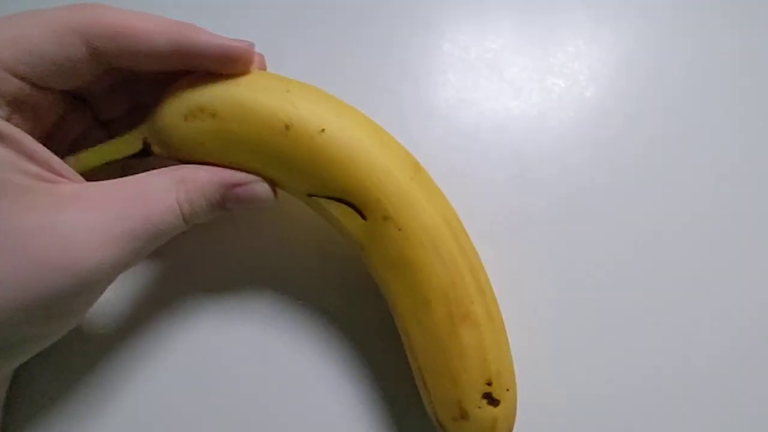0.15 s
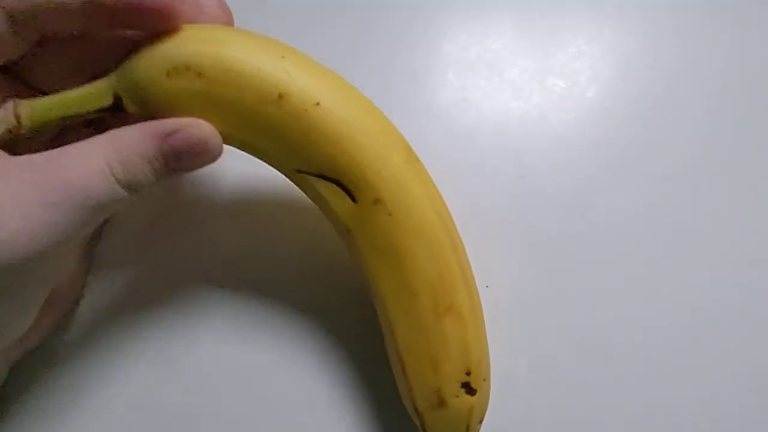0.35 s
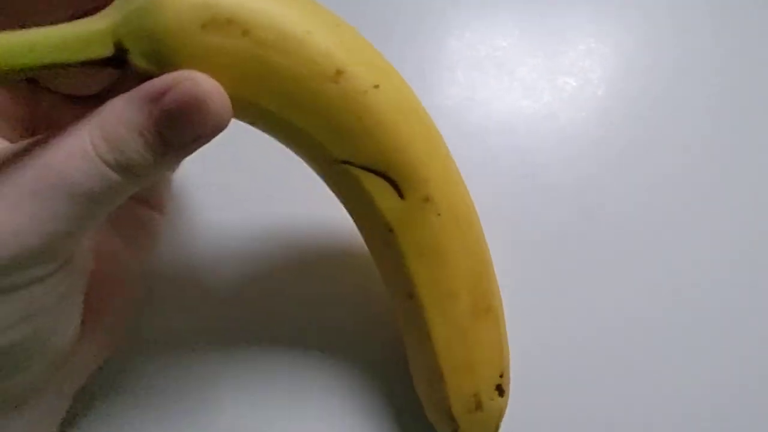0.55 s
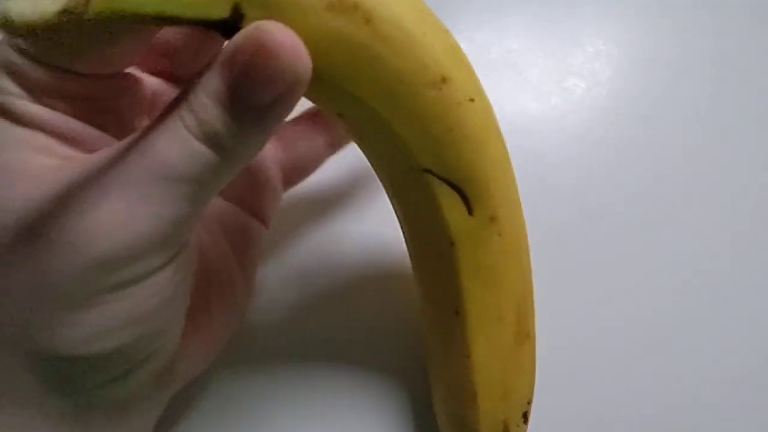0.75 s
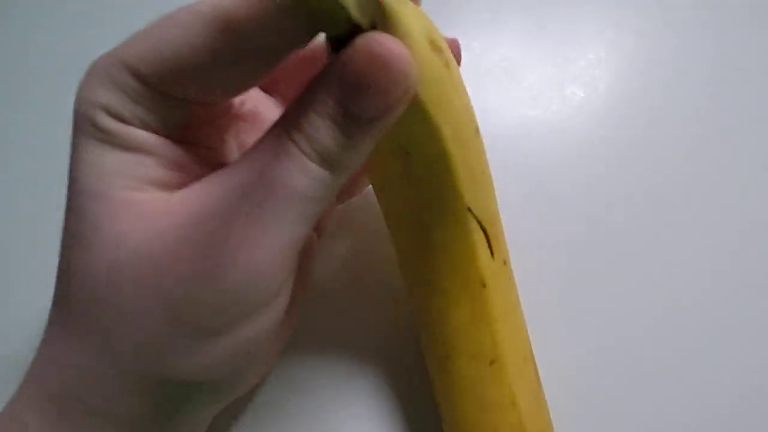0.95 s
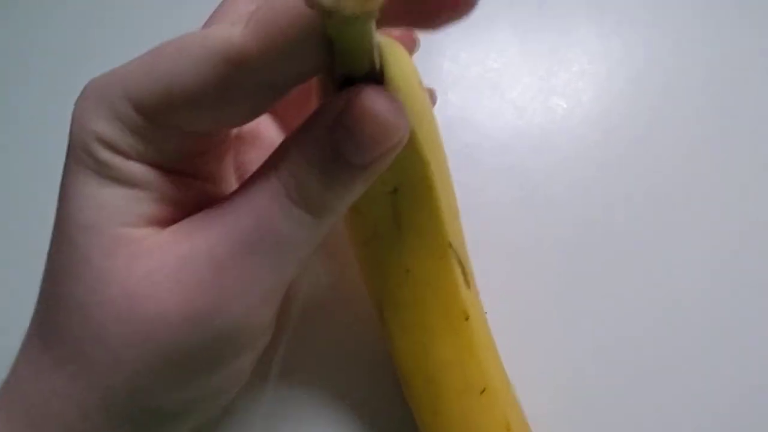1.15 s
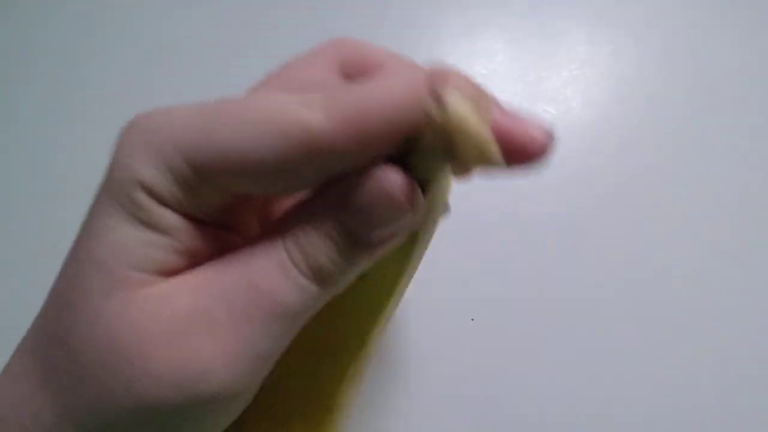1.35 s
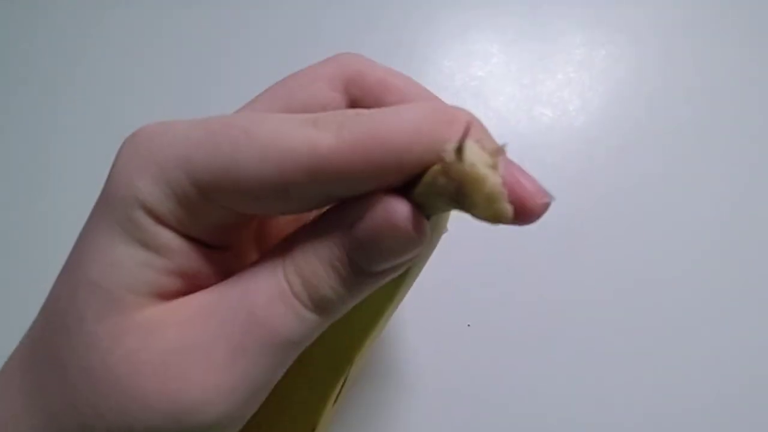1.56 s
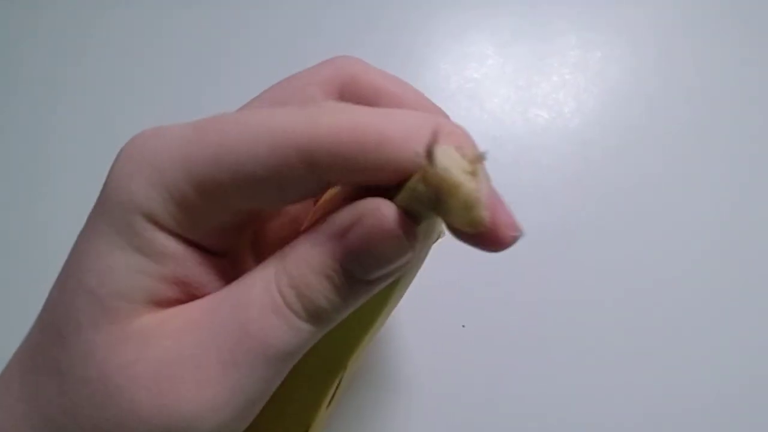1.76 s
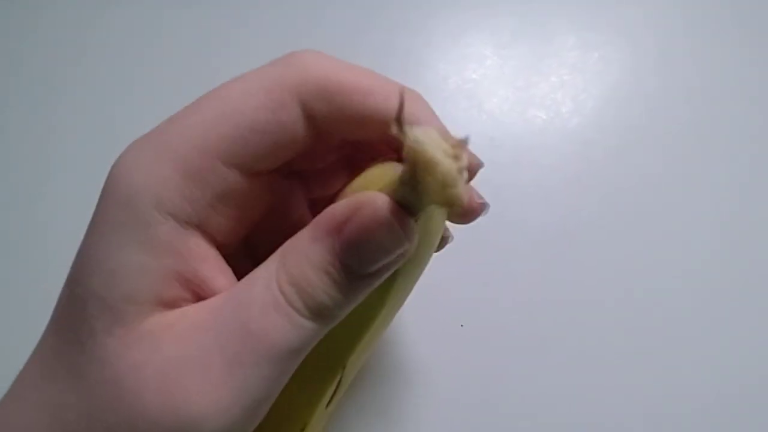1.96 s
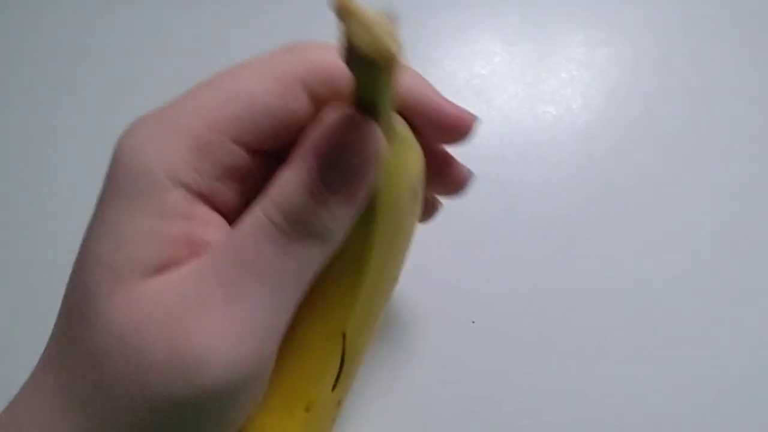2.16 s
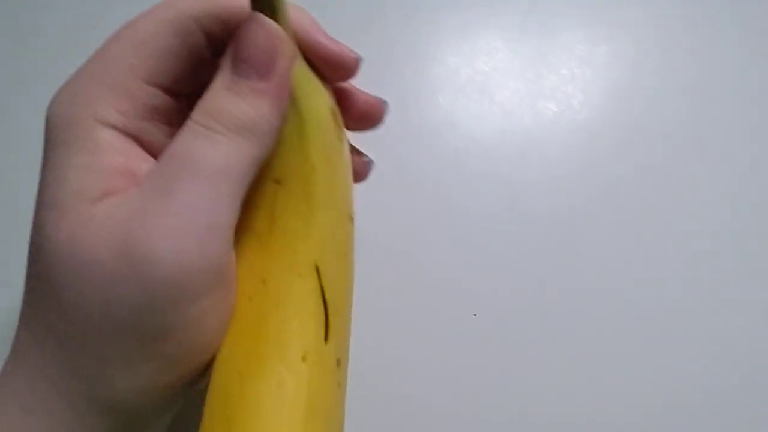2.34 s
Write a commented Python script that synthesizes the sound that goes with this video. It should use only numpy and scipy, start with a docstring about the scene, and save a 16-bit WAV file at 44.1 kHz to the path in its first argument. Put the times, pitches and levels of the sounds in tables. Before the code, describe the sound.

At about 0.2 seconds a hand shifting a banana makes a sharp, hollow thump that dies away quickly in a small room. Much quieter rustles of fingers on the peel follow, with a tick near 0.6, tiny creaks near 0.9 and 1.5, and dull bumps around 0.9 and 1.6. More brief rubs come near 2.0 and 2.3 seconds. Everything is close, over faint steady hiss.

```python
"""Turning a banana in the hand

A hand turns a banana over a table in a small quiet room, heard from close by. A sharp crack opens
the move, with a hollow thump of low modes struck by a run of contacts. Then the fingers slide over
the peel in soft rustles of friction, with a few ticks, two small creaks of the slipping grip and
some dull bumps. The room reverberates briefly, and a faint hiss lies under it all."""
import sys
import numpy as np
from scipy import signal
from scipy.fft import rfft, irfft
from scipy.io import wavfile

SR = 44100
rng = np.random.default_rng(int(sys.argv[2]) if len(sys.argv) > 2 else 0)


def store_pcm(level_fs):
    """Save levels as 16-bit WAV."""
    pcm = np.round(np.clip(level_fs, -1, 1) * 32767).astype(np.int16)
    wavfile.write(sys.argv[1], SR, np.atleast_2d(pcm).T)


N = 110250
T = np.arange(N) / SR


def thump():
    """Modal excitation: soft contacts drive low modes; the longer the contact, the duller the blow."""
    # Each row: start in seconds, level in dB, contact time in seconds.
    blows = [(0.205, -31.5, 0.0009), (0.213, -29, 0.0079), (0.2219, -39, .0046), (0.255, -41.5, 0.0019),
             (0.269, -42, 0.0031), (0.284, -42, .004)]
    # Each row: frequency in Hz, gain in dB, time to fall 60 dB in seconds.
    body_modes = [(54.5, -12, 0.44), (85.7, -3.5, 0.34), (110.8, -6, 0.35), (137.6, -0.5, .22),
                  (153.7, -1, 0.34), (172.3, -5, 0.33), (199, 4.5, 0.042), (242, 2, 0.074),
                  (278.4, -15, 0.32), (307.3, -8.5, 0.26), (384, -3.5, 0.095), (454.2, -16.5, 0.18),
                  (544.5, -14.5, .15), (648, -11.5, 0.052), (743, -18, .1), (821, -24.5, 0.069)]
    force = np.zeros(N)
    for start, db, contact_s in blows:
        push = np.sin(np.pi * np.clip((T - start) / contact_s, 0, 1)) ** 2
        force += from_db(db) * push / push.sum()
    body = np.zeros(N)
    for k, (hz, db, t60) in enumerate(body_modes):
        body += (-1) ** k * from_db(db) * ring(force, hz, t60)  # neighbouring modes alternate in sign
    return pan(db=1.9) * body


def ring(force, hz, t60):
    """Damped resonance: a unit impulse starts a sine of height 1 that falls 60 dB in t60 seconds."""
    radius = from_db(-60 / (t60 * SR))
    angle = 2 * np.pi * hz / SR
    return signal.lfilter([0, np.sin(angle)], [1, -2 * radius * np.cos(angle), radius ** 2], force)


def crack():
    """Impact transient: the abrupt onset of the thump spreads its energy over a wide band."""
    # Each row: start in seconds, level in dB, decay time in seconds, left over right in dB.
    onset = [(0.2052, -22, 0.0013, 5)]
    # Each row: frequency in Hz, relative level in dB.
    spectrum = [(400, 3), (700, -2), (1200, -1), (1700, -1.5), (2200, 3), (2900, 1), (4200, -5),
                (5400, -14), (6900, -7), (8300, -22.5), (11000, -21.5), (14500, -18), (16000, -27)]
    return snaps(onset, spectrum)


def ticks():
    """Brief contact: skin and nail meet the peel so quickly that the sound is mostly treble."""
    # Each row: start in seconds, level in dB, decay time in seconds, left over right in dB.
    contacts = [(0.065, -49.5, 0.0035, 6), (0.567, -43.5, 0.0035, 6), (1.454, -47.5, 0.004, 6),
                (2.247, -50, 0.0026, -5)]
    # Each row: frequency in Hz, relative level in dB.
    spectrum = [(500, -12), (2200, 0), (3800, -4.5), (5500, -2), (7000, -5), (10000, -10), (14500, -7),
                (16000, -16)]
    return snaps(contacts, spectrum)


def snaps(events, spectrum, tail_db=-1.5):
    """Source and filter: an impulse and a crumbling tail, different in each ear, share one spectrum."""
    out = np.zeros((2, N))
    for start, db, decay_s, pan_db in events:
        burst = rng.standard_normal((2, N)) * (T >= start) * np.exp(-np.abs(T - start) / decay_s)
        burst *= from_db(tail_db) / np.linalg.norm(burst, axis=1, keepdims=True)
        burst[:, int(start * SR)] += 1  # the sharp edge
        out += from_db(db) * pan(pan_db) * burst
    return signal.lfilter(causal_response(spectrum), [1], out)


def rubs(catches_per_s=1500, spread_db=1, catch_share=0.42):
    """Sliding friction: skin on peel gives smooth noise and tiny catches, swelling with each stroke."""
    # Each row: peak time in seconds, level in dB, rise and fall in seconds, tilt in dB per octave,
    # left over right in dB.
    slides = [(0.345, -68, 0.026, 0.046, 6.5, 4), (0.455, -68, 0.061, 0.033, 7, 2),
              (0.567, -66.5, 0.019, 0.0096, 7, 16.5), (0.62, -69.5, 0.17, 0.24, 4.5, 3.5),
              (0.85, -70, 0.093, 0.11, 2, 2.5), (1.09, -72, .04, 0.034, -24, 0.5),
              (1.33, -76, 0.12, 0.044, -7, -3), (1.955, -63.5, 0.036, 0.02, 4.5, 6),
              (2.10, -76, 0.016, 0.025, -3, -7), (2.305, -65, 0.035, 0.066, 1, 2.5),
              (2.35, -70.5, 0.049, 0.085, 4, 1.4)]
    # Each row: frequency in Hz, relative level in dB.
    spectrum = [(500, -13), (1400, -4.5), (2600, -2.5), (3600, 1.5), (5500, -2), (7000, 2.5), (8200, -2.5),
                (9500, 0), (10800, -6.5), (12200, 0), (14300, 0.5), (15600, -15)]
    out = np.zeros((2, N))
    for peak, db, rise_s, fall_s, tilt_db, pan_db in slides:
        caught = rng.random(N) < catches_per_s / SR
        strength = from_db(spread_db * np.minimum(rng.exponential(1, N), 4))
        catches = rms_one(caught * strength * rng.standard_normal((2, N)))
        smooth = rng.standard_normal((2, N))
        friction = np.sqrt(catch_share) * catches + np.sqrt(1 - catch_share) * smooth
        stroke = np.exp(-((T - peak) / np.where(T < peak, rise_s, fall_s)) ** 2)
        out += from_db(db) * pan(pan_db) * stroke * coloured(friction, spectrum, tilt_db)
    return out


def bumps():
    """Soft impact: flesh against fruit gives only a few low cycles that swell and die."""
    # Each row: peak time in seconds, level in dB, frequency in Hz, half-width in seconds.
    touches = [(0.918, -54, 78, .014), (0.9326, -60, 132, 0.01), (1.135, -65.5, 147, 0.019),
               (1.5475, -46, 78, 0.014), (1.584, -56, 61.6, 0.021), (1.613, -56.5, 99, 0.012),
               (1.70, -66, 95, .02)]
    out = np.zeros(N)
    for peak, db, hz, width_s in touches:
        swell = np.exp(-((T - peak) / width_s) ** 2)
        out += from_db(db) * swell * np.cos(2 * np.pi * hz * (T - peak))
    return out


def creaks(rise_s=0.0018):
    """Stick and slip: the grip lets go and rings for a few milliseconds at one pitch."""
    # Each row: start in seconds, peak level in dB, frequency in Hz, decay time in seconds.
    slips = [(0.9005, -58, 1416, 0.0018), (1.4534, -53.5, 1438, 0.0038)]
    out = np.zeros(N)
    for start, db, hz, decay_s in slips:
        age = np.maximum(T - start, 0)
        envelope = (1 - np.exp(-(age / rise_s) ** 2)) * np.exp(-age / decay_s)
        out += from_db(db) * envelope / envelope.max() * np.sin(2 * np.pi * hz * age)
    return out


def room(x, build_s=0.0017):
    """Reverberation: a diffuse tail builds quickly and decays at its own rate in each band."""
    # Each row: frequency in Hz, gain in dB, reverberation time in seconds.
    reverberation = [(56, -26, 0.8), (95, -15.5, 0.85), (170, -18, 0.28), (293, -8, 0.27), (600, -4.5, .42),
                     (1130, 8.5, 0.47), (2320, -6, 0.43), (4960, 0.5, 0.4), (13800, 7, 0.37)]
    edges_hz = np.geomspace(40, 18000, 13)
    noises = stereo_noise(), stereo_noise()
    build = 1 - np.exp(-T / build_s)
    response = np.zeros((2, N))
    for k, (low, high) in enumerate(zip(edges_hz, edges_hz[1:])):
        hz = np.sqrt(low * high)
        db, t60 = at_hz(reverberation, hz), at_hz(reverberation, hz, column=2)
        band = signal.sosfilt(signal.butter(2, [low, high], "band", fs=SR, output="sos"), noises[k % 2])
        tail = band * build * from_db(-60 * T / t60)
        tail *= 2 * np.sqrt((high - low) / SR) / np.linalg.norm(tail)  # energy follows bandwidth
        response += from_db(db) * tail
    return signal.fftconvolve(x, response, axes=1)[:, :N]


def hiss(level_db=-67, early_db=-7.5, rise_span_s=(0.17, 0.193), middle_hz=(109, 3000)):
    """Background noise: room hiss with two faint tones; its middle range is quieter before the thump."""
    # Each row: frequency in Hz, relative spectral density in dB.
    spectrum = [(25, 6.5), (50, -2), (80, 10), (130, 4), (210, 6), (330, 0), (620, 0.5), (950, -5.5),
                (1350, -2.5), (1700, -10), (2250, -5.5), (2700, -11), (3100, -7.5), (3350, -2),
                (3650, -12.5), (5200, -12), (7000, -12), (8200, -14), (10800, -18), (14200, -14.5),
                (16000, -16)]
    # Each row: frequency in Hz, rms level in dB.
    tones = [(215.3, -85), (5588, -94)]
    air = from_db(level_db) * coloured(stereo_noise(), spectrum)
    air += sum(from_db(db) * np.sqrt(2) * np.sin(2 * np.pi * hz * T) for hz, db in tones)
    middle = signal.sosfiltfilt(signal.butter(1, middle_hz, "band", fs=SR, output="sos"), air)
    middle_gain = from_db(np.interp(T, rise_span_s, [early_db, 0]))
    return pan(db=-1) * (air + (middle_gain - 1) * middle)


def stereo_noise():
    """Interaural coherence: white noise, alike in both ears in the bass and unrelated in the treble."""
    # Each row: frequency in Hz, correlation between left and right.
    coherence = [(60, 0.64), (130, 0.75), (290, 0.58), (640, 0.07), (1400, 0), (16000, 0)]
    alike = at_hz(coherence, np.fft.rfftfreq(N, 1 / SR))
    mid, side = rfft(rng.standard_normal((2, N)))
    return irfft(np.sqrt((1 + alike) / 2) * mid + np.sqrt((1 - alike) / 2) * side * [[1], [-1]], N)


def coloured(x, spectrum, tilt_db=0):
    """Spectral shaping: impose a spectrum, tilted by tilt_db per octave above 2 kHz; rms 1."""
    hz = np.maximum(np.fft.rfftfreq(N, 1 / SR), 1)
    bass_rolloff = np.minimum(hz / spectrum[0][0], 1) ** 2
    octaves = np.log2(np.maximum(hz, 2000) / 2000)
    gain = bass_rolloff * from_db(at_hz(spectrum, hz) + tilt_db * octaves)
    return rms_one(irfft(rfft(x) * gain, N))


def causal_response(spectrum, size=512):
    """Minimum phase: the most compact causal impulse response with this spectrum; energy 1."""
    magnitude = from_db(at_hz(spectrum, np.fft.rfftfreq(size, 1 / SR)))
    cepstrum = irfft(np.log(magnitude))
    cepstrum[1:size // 2] *= 2  # fold negative time onto positive time
    cepstrum[size // 2 + 1:] = 0
    response = irfft(np.exp(rfft(cepstrum)))
    return response / np.linalg.norm(response)


def at_hz(rows, hz, column=1):
    """Interpolation: read one column of a table on a logarithmic frequency axis."""
    rows = np.array(rows)
    return np.interp(np.log(np.maximum(hz, 1)), np.log(rows[:, 0]), rows[:, column])


def pan(db):
    """Interaural level difference: two gains, the left one db decibels above the right."""
    return from_db(np.array([[db], [-db]]) / 2)


def from_db(db):
    """The decibel scale: 20 dB is a factor of ten in amplitude."""
    return 10 ** (np.asarray(db) / 20)


def rms_one(x):
    """Normalisation: scale to unit mean power."""
    return x / np.sqrt(np.mean(x ** 2) + 1e-20)


def scene(grip_to_room_db=-18):
    """Superposition: the knock, the grip and their reverberation add to the rustles and the hiss."""
    knock = thump() + crack()
    grip = bumps() + creaks() + ticks()
    reverberation = room(knock + from_db(grip_to_room_db) * grip)
    return knock + grip + reverberation + rubs() + hiss()


def record(dry):
    """Band limiting: a steep low-pass filter removes the highest treble."""
    cutoff_hz = 15900
    return signal.sosfilt(signal.ellip(12, 0.1, 70, cutoff_hz, fs=SR, output="sos"), dry)


dry = scene()
out = record(dry)
store_pcm(out)
```